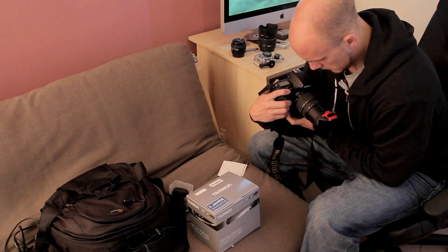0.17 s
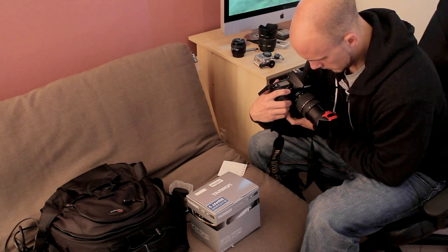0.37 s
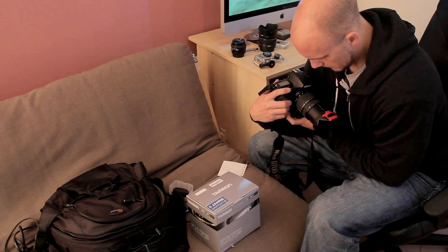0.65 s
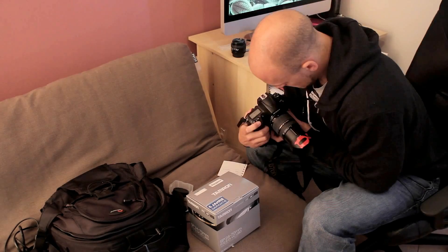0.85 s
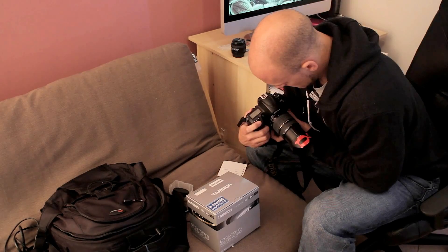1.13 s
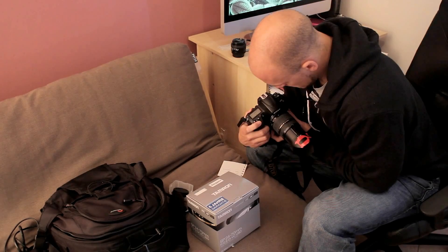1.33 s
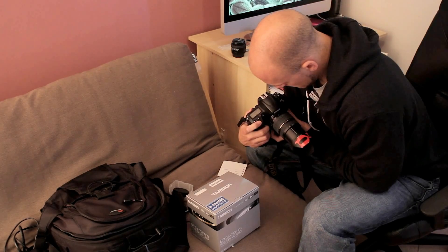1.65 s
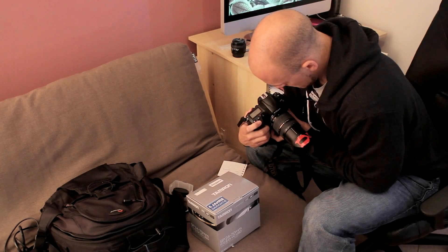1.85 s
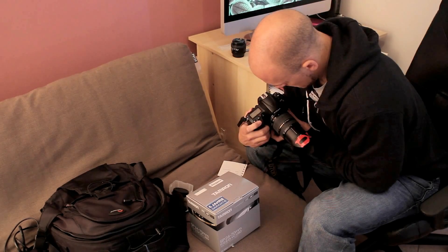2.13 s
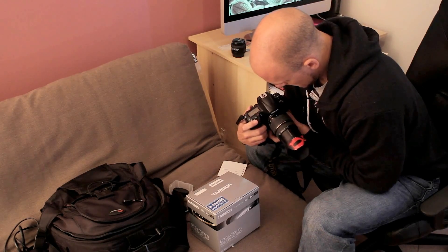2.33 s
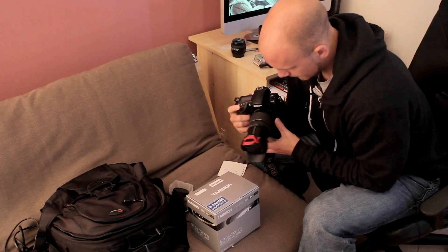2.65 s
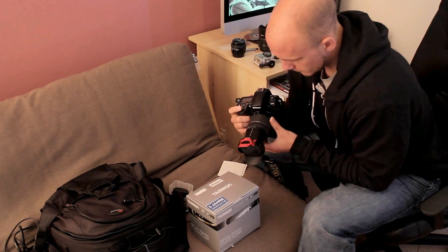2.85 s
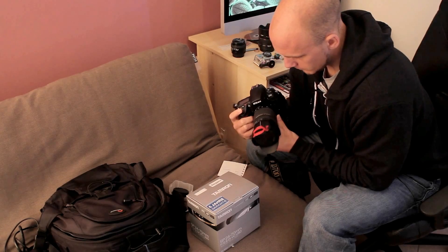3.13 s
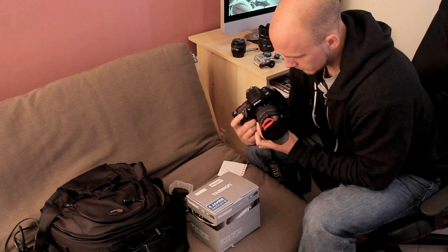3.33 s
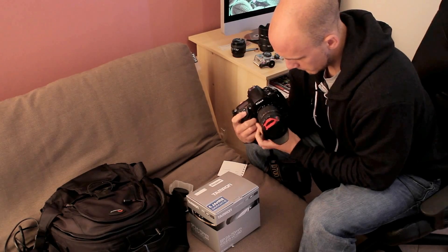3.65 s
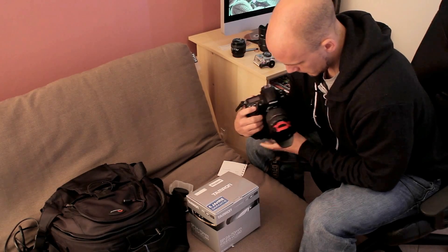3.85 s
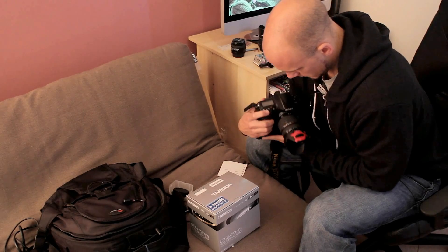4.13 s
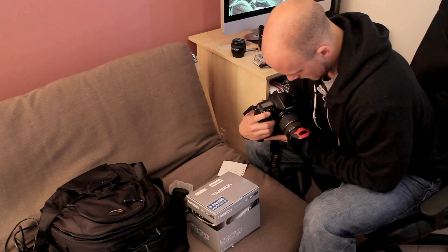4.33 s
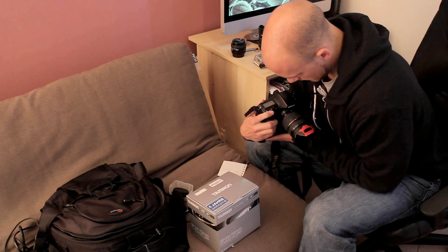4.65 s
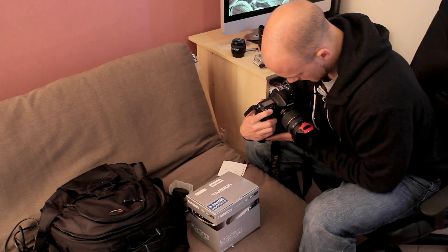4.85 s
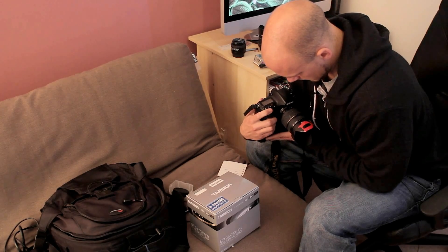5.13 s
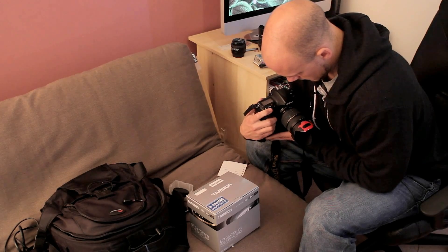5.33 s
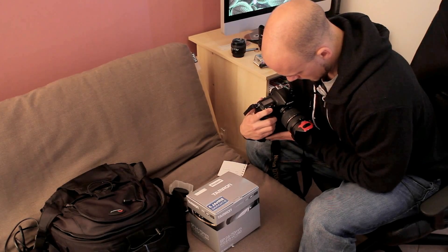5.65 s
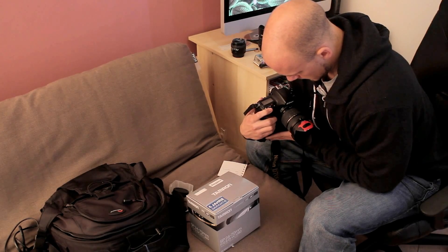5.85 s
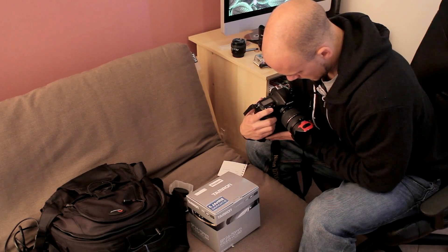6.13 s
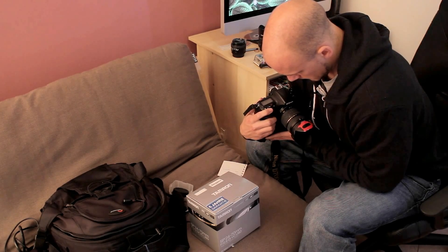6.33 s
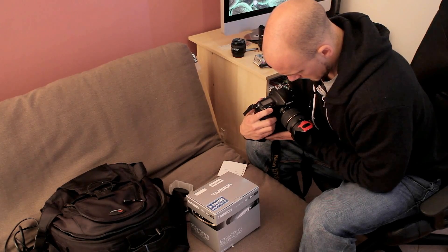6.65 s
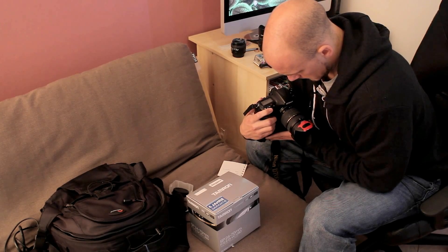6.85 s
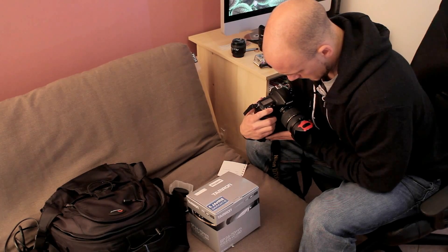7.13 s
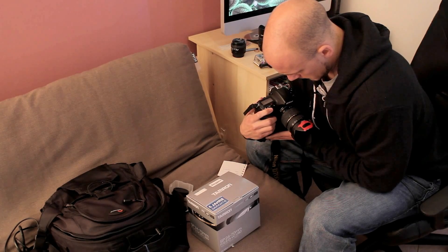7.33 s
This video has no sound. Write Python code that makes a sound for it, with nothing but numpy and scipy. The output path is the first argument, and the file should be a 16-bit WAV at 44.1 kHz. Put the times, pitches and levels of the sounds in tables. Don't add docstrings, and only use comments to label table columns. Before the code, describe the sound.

Close-up whirring, gritty lens motor runs in brief bursts ending in hard plastic clacks, amid small taps, rubbing hands and faint low hum.

```python
import sys
import numpy as np
from scipy import signal
from scipy.io import wavfile

SR = 44100
rng = np.random.default_rng(int(sys.argv[2]) if len(sys.argv) > 2 else 0)


def boost(x):
    u = np.asarray(x, float) / 20
    return 10 ** u


def output_pcm(signal):
    pcm = np.clip(np.atleast_2d(signal).T, -1, 1) * 32767
    wavfile.write(sys.argv[1], SR, np.round(pcm).astype(np.int16))


N = 329868


def evened(x):
    return x / np.sqrt(np.mean(x ** 2) + 1e-20)


def peaked(x):
    return x / abs(x).max()


def read(points, hz):
    f, value = np.transpose(points)
    return np.interp(np.log(hz + 1), np.log(f + 1), value)


def add(mix, s, sound):
    part = mix[round(s * SR):][:len(sound)]
    part += sound[:len(part)]


def coloured(x, points, rings=()):
    hz = abs(np.fft.fftfreq(4096, 1 / SR))
    db = read(points, hz)
    for f, width, top_db in rings:
        db = db + top_db / (1 + (2 * (hz - f) / width) ** 2)
    log_gain = np.log(boost(np.maximum(db, -100)))
    taps = np.fft.ifft(np.exp(log_gain - 1j * signal.hilbert(log_gain).imag)).real[:2048]
    return signal.oaconvolve(x, taps)[:len(x)]


def band(x, lo_hz, hi_hz):
    return signal.sosfilt(signal.butter(2, [lo_hz, hi_hz], "band", fs=SR, output="sos"), x)


def split_at(x, hz, side):
    return signal.sosfilt(signal.butter(2, hz, side, fs=SR, output="sos"), x)


def drift(size, hz):
    noise = rng.standard_normal(size + 4000)
    return evened(signal.lfilter([1], [1, -np.exp(-2 * np.pi * hz / SR)], noise)[4000:])


def sine(hz):
    return np.sqrt(2) * np.sin(2 * np.pi * (np.cumsum(hz) / SR + rng.random()))


# (rise [s], fall [s], low gear ring [dB], high gear ring [dB])
GEARS = [(.0008, 0.0015, -8.5, -17), (0.0011, 0.0021, -18.5, -25), (0.00083, 0.0011, -15.5, -18),
         (.001, 0.0017, -24, -26), (0.0022, 0.003, -26, -30)]
# (time [s], level above the grind [dB])
KNOCKS_OUT = [(0.0064, 5.5), (0.0115, 3.5), (0.018, 5), (0.0254, 9.5), (0.0382, 10.5), (0.05, 6),
              (0.056, 4), (0.062, 7), (0.0754, 5), (1.3365, 4), (1.3775, 4), (1.3891, 4), (1.401, 1),
              (1.4145, 7.5), (1.448, 8), (1.4645, 7), (1.476, 3), (1.486, 11), (1.5144, 4.5), (1.538, 10),
              (1.772, 7), (1.786, 7.5), (1.7988, 4), (1.813, 7.5), (1.821, 12), (1.837, 10), (1.85, 6),
              (1.8626, 11), (1.8699, 9), (1.889, 7), (1.8943, 4), (1.901, 5), (1.9134, 11), (1.926, 8),
              (1.9446, 8.5), (1.963, 8), (1.9758, 7), (1.988, 9), (1.9993, 9.5)]
KNOCKS_IN = [(5.196, 6), (5.21, 4), (5.219, 3.8), (5.258, 5.8), (5.279, 3.3), (5.289, 6.6), (5.2976, 5),
             (5.3054, 5), (5.3104, 4), (5.3276, 4), (5.3462, 4.4), (7.1947, 4), (7.1985, 5), (7.2045, 6),
             (7.21, 10.7), (7.2185, 3), (7.229, 11), (7.2425, 4), (7.2535, 9), (7.272, 10.5), (7.28, 4),
             (7.289, 3), (7.299, 8), (7.304, 5.4), (7.3205, 7.5), (7.334, 4.5), (7.3425, 7.5),
             (7.3577, 5.6), (7.3652, 6.9)]


def tooth_knocks(t, rise, fall):
    rows = [row for row in KNOCKS_OUT + KNOCKS_IN if t[0] <= row[0] < t[-1]]
    at, knock_db = np.transpose(rows)[:, :, None]
    away = np.maximum((at - t) / rise, (t - at) / fall)
    return boost((knock_db * np.exp(-away ** 2)).max(axis=0))


def gear_ring(knock, lo_hz, hi_hz, db):
    return boost(db) * evened(band(rng.standard_normal(len(knock)) * (knock ** 2 - 0.7), lo_hz, hi_hz))


TOP_HZ = [1112, 1529]
# (time from full speed [s], share of full speed)
SPEED = [(-.12, .85), (-.084, .95), (-.072, .857), (-.06, .9), (-.042, .96), (-.027, .99), (0, 1)]
# (multiple of the commutator rate, level in runs 1-5 [dB] x 5)
WHINE = [(1, -16, -19, -9, -27, -32), (2, -30, -28, -28, -17, -29), (3, -21, -13.5, -17, -40, -40),
         (3.354, -14, -9, -4, -40, -40), (3.385, -40, -40, -40, -20, -30), (4, -30, -30, -30, -25, -30)]


def motor_whine(t, dip_db, run, direction, full_s, strength_db, flutter_db, waver_share, fade_db):
    hz = TOP_HZ[direction] * np.interp(t - full_s, *np.transpose(SPEED))
    waver = 1 + waver_share * drift(len(t), 60)
    fade = fade_db * np.maximum(t - full_s, 0)
    short = 1 - hz / hz.max()
    whine = np.zeros(len(t))
    for multiple, *run_db in WHINE:
        order_db = run_db[run] + flutter_db * drift(len(t), 60)
        if multiple in (1, 3):
            order_db = order_db - 150 * short
        if multiple > 1:
            order_db = order_db - fade
        whine += boost(order_db) * sine(multiple * hz * waver)
    level_db = strength_db + np.minimum(dip_db + 9.5, 0) - (8 + 220 * direction) * short
    slack_taken = np.clip((t - full_s + .088) / .006, 0, 1)
    return boost(level_db) * slack_taken * whine


# (time [s], level [dB])
RUNS = [
    [(0.0, -44.5), (0.028, -46.5), (0.079, -43.5)],
    [(1.285, -73), (1.321, -50.5), (1.415, -45), (1.557, -45.5), (1.565, -37.5)],
    [(1.74, -90), (1.748, -45), (1.825, -42), (1.856, -46), (1.89, -42), (1.94, -45), (2.017, -46)],
    [(5.145, -72), (5.187, -45.5), (5.291, -38), (5.335, -38.5), (5.345, -34), (5.361, -38.5)],
    [(7.165, -57), (7.173, -39), (7.187, -45.5), (7.203, -35.5), (7.361, -38.5), (7.373, -41), (7.385, -75)],
]
# (full speed time [s], growl level [dB], whine level [dB])
DRIVES = [(-.05, -55.5, -45), (1.41, -49, -38.5), (1.848, -53.5, -49.5), (5.272, -47, -34),
          (7.268, -49, -28.5)]
# (whine flutter [dB], pitch waver [share], upper-order fade [dB/s], tooth scatter [dB])
STEADINESS = [(2, .002, 0, 2), (2, .003, 0, 1.5), (3, .005, 50, 1.5), (3.5, .006, 0, 2), (4, .008, 0, 2)]
DIRECTIONS = [0, 0, 0, 1, 1]
# (frequency [Hz], level per Hz [dB])
BARREL = [
    [(88, -44.5), (150, -8.5), (398, -6.5), (941, -10.5), (1100, -9), (1310, -10), (3040, -9), (3620, -3),
     (4860, -14), (5570, -17), (6640, -18.5), (12900, -22), (16000, -31.5)],
    [(88, -60), (150, -7), (217, 8), (291, -12), (328, 4.5), (612, -0.5), (1900, -11), (3550, -8),
     (4410, -9), (5250, -9), (8730, -13.5), (14500, -25), (16000, -39)],
]
# (frequency [Hz], width [Hz], level [dB])
BARREL_RINGS = [
    [(442, 680, 17.7), (3400, 250, 2), (5860, 1500, 6.6), (8040, 960, 5.3)],
    [(623, 136, 6.3), (3250, 1220, 9), (5070, 420, 2.71), (6960, 1500, 4.1)],
]


def motor(run):
    s, effort_db = np.transpose(RUNS[run])
    t = np.arange(s[0], s[-1] + .004, 1 / SR)
    level_db = np.interp(t, s, effort_db)
    dip_db = level_db - level_db.max()
    full_s, growl_db, strength_db = DRIVES[run]
    flutter_db, waver_share, fade_db, scatter_db = STEADINESS[run]
    rise, fall, ring_db, high_ring_db = GEARS[run]
    way = DIRECTIONS[run]

    knock = tooth_knocks(t, rise, fall)
    teeth = rng.standard_normal(len(t)) * boost(scatter_db * drift(len(t), 250))
    growl = split_at(coloured(teeth * np.sqrt(knock), BARREL[way], BARREL_RINGS[way]), 1100, "low")
    grind = split_at(coloured(teeth * knock, BARREL[way], BARREL_RINGS[way]), 1100, "high")
    ring = gear_ring(knock, 5300, 5800, ring_db) + gear_ring(knock, 8000, 8650, high_ring_db)
    whine = motor_whine(t, dip_db, run, way, full_s, strength_db, flutter_db, waver_share, fade_db)

    sound = boost(level_db) * (0.65 * evened(grind) + ring)
    sound -= boost(growl_db + 0.61 * dip_db) * evened(growl)
    return s[0], signal.windows.tukey(len(t), .02) * (sound + whine)


# (time [s], length [s], whirr level [dB], stop shake level [dB], step rate [Hz])
BACKOFFS = [
    (0.092, 0.054, -60.5, -62, 173),
    (1.577, 0.062, -62, -64, 173.5),
    (2.026, 0.0567, -59, -53, 174.6),
    (5.379, 0.05, -58, -56.5, 177.8),
    (6.962, 0.073, -57, -82, 181),
]
# (frequency [Hz], level per Hz [dB])
WHIRR = [(300, -17), (500, -3), (1300, -7.5), (2170, -11), (3500, -15), (4440, -13.5), (5520, -12),
         (7500, -13), (7900, -28), (16000, -68)]
# (frequency [Hz], width [Hz], level [dB])
WHIRR_RINGS = [(1430, 60, 10), (3400, 200, 8), (4480, 120, 6), (6830, 80, 6), (7450, 90, 10)]
STEP_STRONG = [8, 18, 19, 20, 25, 25, 36, 38, 43, 43]


def backoff(s, length, whirr_db, shake_db, hz):
    t = np.arange(0, length, 1 / SR)
    to_go = 1 - t / length
    level = boost(whirr_db - 10 * (0.5 + to_go)) + boost(shake_db - 60 * t / 0.033)
    rate = hz * (1 + 0.001 * drift(len(t), 30) - 0.0467 * to_go ** 3)
    steps = np.zeros(len(t))
    for k in range(4, 46):
        step_db = 3 * rng.standard_normal() + 5.8 * STEP_STRONG.count(k)
        steps += boost(step_db) * sine(k * rate)
    whirr = evened(coloured(rng.standard_normal(len(t)), WHIRR, WHIRR_RINGS))
    whirr += boost(4) * evened(coloured(steps, WHIRR))
    tone = boost(whirr_db + 1.5 - 19 * to_go ** 3) * sine(3 * rate)
    return s, (level * whirr + tone) * signal.windows.tukey(len(t), .1)


# (frequency [Hz], level [dB], t60 [s])
SHELL = [(434, 3.5, 0.019), (674.5, 4, 0.017), (1011, 0.5, 0.022)]


def click(s, peak_db, thud_db, fizz_db, hz, t60):
    t = np.arange(4000) / SR
    rebounds = .25 + (rng.random(len(t)) < .06)
    blows = rng.standard_normal(len(t)) * rebounds * boost(-60 * t / t60)
    blows[0] = 2.6 * rng.choice([-1, 1])
    wall = np.sin(2 * np.pi * hz * rng.uniform(.96, 1.04) * t) * boost(-60 * t / .005)
    ring = signal.oaconvolve(blows, wall)[:len(t)]
    crack = peaked(band(blows, 2330, 6170))
    fizz = boost(fizz_db + 4) * peaked(band(blows, 5600, 9860))
    thud = np.zeros(len(t))
    for f, db, ring_s in SHELL:
        thud += boost(db - 60 * t / ring_s) * np.sin(2 * np.pi * f * rng.uniform(0.809, 1.23) * t)
    return s + 0.0009, boost(peak_db + 3) * (crack + 0.58 * ring_scale(ring) + fizz + 0.79 * boost(thud_db) * thud)


def ring_scale(ring):
    return peaked(ring)


# (time [s], peak level [dB], thud [dB re peak], fizz [dB re
# peak], ring [Hz])
BLOWS = [(0.0818, -27, -9, -3, 5570), (1.5674, -22, -17, -26, 2170), (1.5685, -22, -14.5, -47, 4030),
         (1.9116, -32, -27, -10, 3400), (2.02, -24, -14, -3, 7650), (2.0228, -30, -16, -20, 5630),
         (3.4574, -21.5, -15, -12, 3910), (3.459, -26.5, -7, -24, 3800), (3.6461, -30, -18, -10, 2900),
         (4.0349, -38, -9, -14, 6330), (5.3636, -27.5, -14, -10, 4800), (5.3653, -16.5, -17, -12, 3300),
         (5.4387, -35, -15.5, -32, 5430), (7.0502, -37.5, -16, -40, 3570), (7.1714, -31, -19, -6, 3400),
         (7.1743, -30.5, -13, -17, 3300), (1.5656, -32, -6.5, -12, 3700), (1.5691, -25, -12, -5, 5030)]
# (time [s], peak level [dB], thud [dB re peak])
TICKS = [(1.3084, -51, -19), (1.6272, -49, -23), (1.7507, -42.5, -0.5), (2.2117, -60, 5),
         (2.8691, -53.5, -8), (3.1926, -62, -16.5), (4.8489, -62.5, -17.5), (5.1845, -41, -14),
         (5.4214, -44.5, -23), (6.9504, -44.5, -8.5), (7.034, -51, -6.5), (7.1472, -50, -14),
         (7.1694, -40, -20)]
RATTLES = [(1.3247, -36, -46), (2.6177, -49.5, -18), (2.9946, -48.5, -5), (5.1473, -56, -3.5),
           (6.9352, -45, -12), (6.9424, -49, -1)]
TAPS = [(0.0853, -32, -10), (0.1424, -46.5, -8), (1.289, -56, -11), (1.6485, -32, -11),
        (2.0838, -47.5, -7.5), (2.3014, -58, -9), (2.4194, -65.5, 4), (2.5491, -59, -1.5),
        (2.9088, -52, -7), (2.9224, -59, 4.5), (3.1025, -52.5, -3), (3.4648, -35.5, -7), (3.7417, -66, -1),
        (3.7767, -57, -13), (3.9558, -62.5, 6.5), (3.9678, -58, -4), (4.003, -53.5, -0.5)]
SHUFFLES = [(2.9765, -37, -20), (3.6678, -43, -6), (3.8558, -46, -6.5), (3.9442, -54.5, -10)]
SNAPS = [(0.2488, -50, -8), (1.7432, -48.5, -27), (2.197, -48.5, -21), (3.8713, -54.5, -9)]


def clicks(out):
    for row in BLOWS:
        add(out, *click(*row, t60=0.012))
    for row in TICKS:
        add(out, *click(*row, fizz_db=-22, hz=3730, t60=.015))
    for row in RATTLES:
        add(out, *click(*row, fizz_db=-41, hz=3860, t60=.036))
    for row in TAPS:
        add(out, *click(*row, fizz_db=-33, hz=1950, t60=.017))
    for row in SHUFFLES:
        add(out, *click(*row, fizz_db=-14, hz=1540, t60=.026))
    for row in SNAPS:
        add(out, *click(*row, fizz_db=12.8, hz=5600, t60=.0049))


# (time [s], frequency [Hz], level [dB], t60 [s])
METAL = [(3.458, 1545, -53, .27), (3.458, 1600, -57, .15), (5.366, 1530, -70, .4), (7.375, 1530, -71.5, .6),
         (7.375, 5150, -79.5, .55), (7.375, 3060, -68, .12)]
# (time [s], frequency [Hz], level [dB], t60 [s])
PANELS = [(.083, 760, -32, 0.025), (.262, 514, -52.5, 0.033), (1.568, 760, -34, 0.027),
          (1.57, 1454, -37, 0.028), (1.749, 477, -46, 0.046), (2.0206, 464, -27, 0.043),
          (2.418, 930, -57, 0.04), (2.55, 745, -59, .03), (2.817, 1110, -62.5, .03), (2.84, 1110, -62, .03),
          (2.862, 950, -59, .03), (3.1035, 985, -50, .05), (3.86, 900, -53, .03), (3.957, 900, -57, .03),
          (3.459, 1520, -25.5, 0.019), (3.646, 990, -40, 0.015), (3.648, 1983, -47, 0.059),
          (4.037, 970, -40, 0.02), (4.036, 560, -42, 0.03), (5.365, 1090, -27, 0.02),
          (5.3662, 7200, -28, .008), (5.3662, 5400, -28, .01), (5.3661, 3250, -23, .016),
          (5.365, 560, -31, .03), (3.458, 400, -34, .03)]


def ringing_parts(out):
    t = np.arange(SR // 4) / SR
    for s, hz, db, t60 in METAL + PANELS:
        flutter_db = 2 * drift(len(t), 40) * np.minimum(t / .04, 1)
        add(out, s, boost(db - 60 * t / t60 + flutter_db) * np.sin(2 * np.pi * hz * t))


# (peak time [s], rise [s], fall [s], body level [dB], sizzle level [dB])
BRUSHES = [(.255, .03, 0.042, -59.5, -64), (.476, 0.019, .012, -72, -69), (2.2, 0.022, .032, -62, -63.5),
           (2.55, 0.015, 0.02, -64, -64), (3.472, 0.0027, 0.067, -50, -57.5),
           (6.092, 0.031, 0.018, -71.5, -75)]


def brush(s, rise, fall, body_db, sizzle_db):
    t = np.arange(-rise, 1.6 * fall, 1 / SR)
    away = np.maximum(-t / rise, t / fall)
    slips = rng.standard_normal(len(t)) * boost(3.5 * drift(len(t), 150))
    body = boost(body_db - 21 * away) * evened(band(slips, 620, 5300))
    sizzle = boost(sizzle_db - 42.5 * away) * evened(band(slips, 3600, 16400))
    return s - rise, (body + sizzle) * signal.windows.tukey(len(t), .2)


# (time [s], length [s], pitch [Hz], level [dB])
SQUEAKS = [
    (3.22, .07, 3420, -72),
    (3.19, .08, 3800, -75),
    (3.225, .06, 1250, -72),
]


def squeak(s, length, hz, db):
    size = round(length * SR)
    tone = sine(hz * (1 + 0.014 * drift(size, 40)))
    return s, boost(db + 4 * drift(size, 60)) * np.hanning(size) * tone


# (time [s], length [s],
# centre [Hz], width [octaves], level [dB])
SCRAPES = [(.232, 0.0061, 6500, 1.2, -67), (0.2456, .003, 11500, 0.74, -54.5),
           (0.2485, 0.0033, 11000, 0.73, -54), (0.26, 0.0078, 2960, 2.8, -63),
           (0.271, 0.0084, 4000, 1.2, -73), (2.18, 0.0058, 4960, 1, -62), (2.1927, 0.0035, 10500, 1.2, -52),
           (2.204, 0.0037, 4180, .8, -67), (2.2077, .005, 4000, 1.3, -63), (2.218, 0.0069, 4180, .8, -68),
           (2.312, .008, 3500, 1, -72), (2.455, .015, 10500, .2, -77), (2.509, 0.042, 9500, .7, -71),
           (2.574, .012, 10000, .7, -72), (2.616, 0.0047, 6300, 0.65, -61.5), (2.78, .012, 2000, 0.33, -75),
           (2.849, .01, 6500, .5, -74), (2.972, 0.0047, 2500, 1.8, -61), (2.993, 0.0034, 8900, .4, -63),
           (3.19, 0.0073, 4600, .2, -69), (3.5, .01, 1800, 1.5, -61), (4.134, 0.006, 4800, 1.4, -68),
           (4.145, 0.0051, 3980, 1.9, -62), (4.149, .008, 4370, 0.57, -61.5), (5.168, .006, 5000, 1.6, -58),
           (5.361, 0.0026, 3520, 1, -43), (6.09, 0.0077, 2900, .2, -65.5), (6.092, 0.0084, 4400, 0.23, -69),
           (6.238, 0.0072, 3800, .25, -70), (6.24, .006, 2300, .2, -75), (6.35, 0.63, 780, .35, -79),
           (7.0224, 0.004, 3480, 1.5, -63), (7.034, 0.0047, 5100, .2, -60), (7.1645, .004, 9000, 1.2, -50)]


def scrape(s, length, hz, octaves, db):
    size = round(length * SR)
    grit = np.append(rng.standard_normal(size) * np.hanning(size), np.zeros(200))
    spread = 2 ** (octaves / 2)
    return s, boost(db) * evened(band(grit, hz / spread, min(hz * spread, 16000)))


def camera():
    out = np.zeros(N)
    for run in range(len(RUNS)):
        add(out, *motor(run))
    for row in BACKOFFS:
        add(out, *backoff(*row))
    clicks(out)
    ringing_parts(out)
    for row in BRUSHES:
        add(out, *brush(*row))
    for row in SQUEAKS:
        add(out, *squeak(*row))
    for row in SCRAPES:
        add(out, *scrape(*row))
    return split_at(out, 90, "high")


# (time [s], level [dB])
RUB = [(0.0, -57), (0.05, -52.5), (0.118, -62.5), (0.2, -74.5), (1.042, -80), (1.29, -78), (2.09, -80),
       (2.2, -69.5), (2.46, -70), (2.62, -75), (2.97, -68), (3.36, -69.5), (3.58, -75), (4.36, -77),
       (5.04, -73.5), (6.364, -72.5), (6.91, -70.5), (7.16, -71.5)]
# (time [s], length [s], middle rub level [dB], bright rub level [dB])
SLIDES = [(-.15, 0.38, -63, -72), (1.95, 0.8, -63, -85), (2.414, 0.35, -89, -74.5), (2.894, 0.44, -62, -64),
          (3.1, 0.51, -58, -69), (3.546, 0.31, -69, -76.5), (3.698, 0.75, -78, -77),
          (5.287, 0.86, -69, -106), (6.9, 0.17, -72, -74)]
# (frequency [Hz], level per Hz [dB])
DULL = [(200, -9), (450, 6.5), (800, 2.5), (1500, -8.5), (3000, -26.5)]
BRIGHT = [(590, -26.5), (1000, -2), (1790, -9), (1910, -11), (2980, -13), (3500, -6.5), (5630, -12.5),
          (7700, -10), (14600, -24.5), (16000, -35.5)]


def hands():
    t = np.arange(N) / SR
    dull_db = np.interp(t, *np.transpose(RUB))
    start, length, middle_db, bright_db = np.transpose(SLIDES)[:, :, None]
    arch = np.sin(np.pi * np.clip((t - start) / length, 0, 1)) ** 2
    middle = boost(dull_db - 11.5) + (boost(middle_db) * arch).sum(axis=0)
    bright = boost(-86.5) + (boost(bright_db) * arch).sum(axis=0)
    slips = rng.standard_normal((3, N)) * boost(1.5 * drift(N, 150) + 1.2 * drift(N, 12))
    out = boost(dull_db) * evened(coloured(slips[0], DULL))
    out += middle * boost(-12) * evened(band(slips[1], 986, 4080))
    return out + bright * evened(coloured(slips[2], BRIGHT))


# (frequency [Hz], t60 [s])
ROOM = [(200, 0.28), (1000, 0.24), (4000, 0.12), (12000, 0.099)]


def room(x):
    taps = np.zeros(SR // 2)
    at = np.arange(200, SR // 2 - 20, 20)
    taps[at + rng.integers(0, 20, len(at))] = rng.choice([-1., 1.], len(at))
    hz, t, z = signal.stft(taps, SR, nperseg=256)
    decay = boost(-60 * t / read(ROOM, hz)[:, None])
    tail = signal.istft(z * decay, SR, nperseg=256)[1]
    return signal.fftconvolve(x, tail / np.linalg.norm(tail))[:N]


DRUM = [-64.5, -71, -69, -63, -74, -70.5, -70.5, -71, -75.5, -73, -76.5, -72, -84.5, -76.5, -83.5, -83, -82,
        -85.5]
# (time [s], pitch [Hz], level [dB])
DRONE = [(2.05, 107.6, -61.5), (2.324, 107.7, -62), (2.572, 108.8, -71), (2.706, 106.6, -57.5),
         (3.416, 105.7, -64), (3.466, 108.2, -57), (3.5, 105.9, -64.5), (3.968, 105, -57.5),
         (4.03, 107.6, -68)]
# (frequency [Hz], level per Hz [dB])
RUMBLE = [(15, -20.5), (32, -16), (45, -3.5), (150, 2), (250, -5), (350, -28), (500, -38)]


def hum():
    t = np.arange(N) / SR
    drum_hz, mains_hz = 20.377, 50.05
    turns = np.cumsum(drum_hz * (1 + .0012 * drift(N, .5))) / SR
    drum = np.zeros(N)
    for k, db in enumerate(DRUM, 1):
        phase = k * turns + rng.uniform(0, 0.72)
        drum += boost(db + 3 + 1.56 * drift(N, 2.3)) * np.cos(2 * np.pi * phase)
    s, hz, db = np.transpose(DRONE)
    drone = boost(np.interp(t, s, db, -100, -100)) * sine(np.interp(t, s, hz))
    rumble = boost(-66 + 2.2 * drift(N, 2.6)) * evened(coloured(rng.standard_normal(N), RUMBLE))
    mains = boost(-67) * sine(np.full(N, mains_hz))
    return drum + drone + rumble + mains


# (frequency [Hz], level per Hz [dB])
HISS = [(180, -28.5), (300, 1.5), (405, -4), (557, -9), (681, -17), (846, -10), (1030, -19.5),
        (1120, -15.5), (1650, -21), (7560, -25.5), (13300, -27.5), (14500, -37), (16300, -46.5)]


def hiss():
    return boost(-73.5) * evened(coloured(rng.standard_normal(N), HISS))


def scene():
    near = camera()
    mono = near + boost(-21) * room(near) + hands() + hum() + hiss() + .0008
    return mono * np.array([[1.412], [.588]])


def low_pass(x):
    return signal.sosfilt(signal.butter(12, 16470, fs=SR, output="sos"), x)


def record(dry):
    edge = signal.firwin(511, 16200, window=("kaiser", 9), fs=SR)
    limited = signal.oaconvolve(dry, edge[None], "same")
    return low_pass(limited)


dry = scene()
out = record(dry)
output_pcm(out)
```